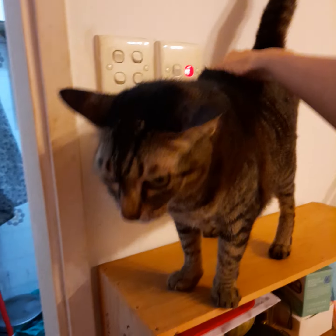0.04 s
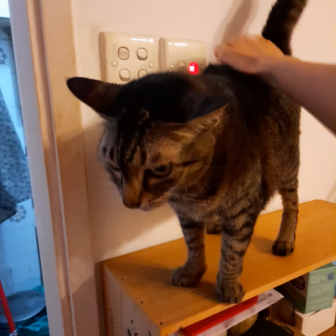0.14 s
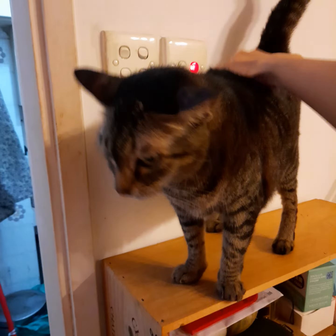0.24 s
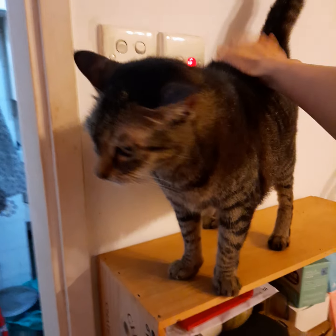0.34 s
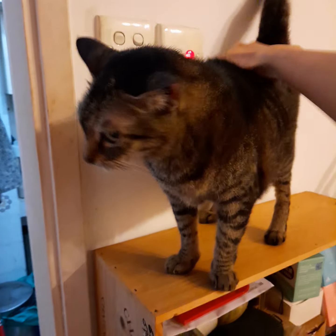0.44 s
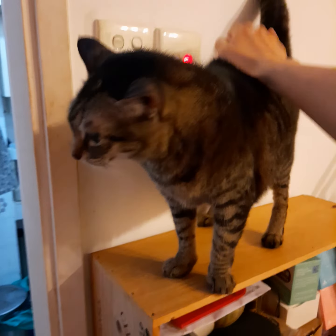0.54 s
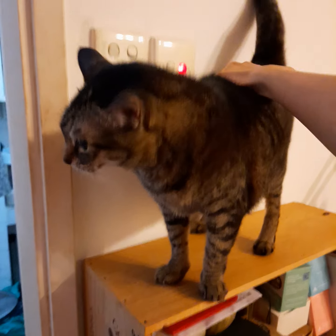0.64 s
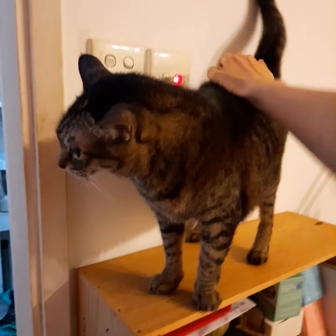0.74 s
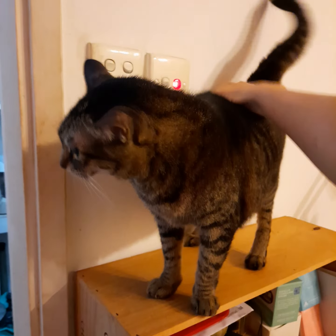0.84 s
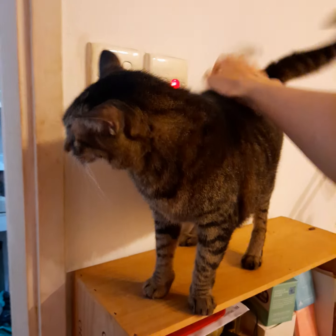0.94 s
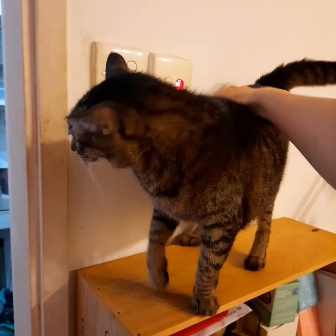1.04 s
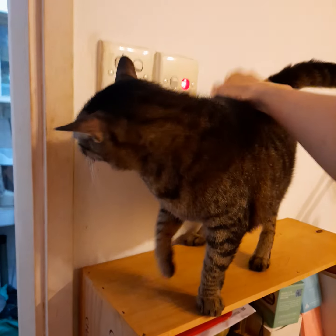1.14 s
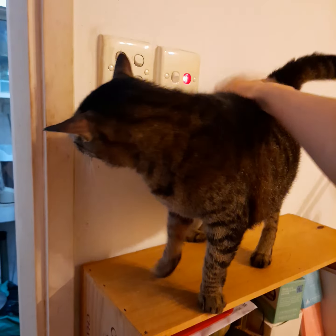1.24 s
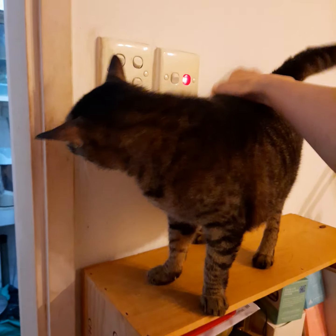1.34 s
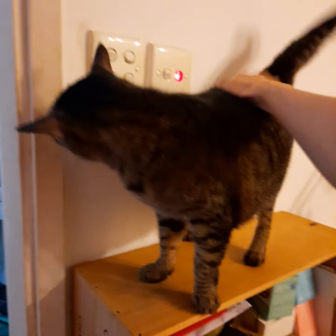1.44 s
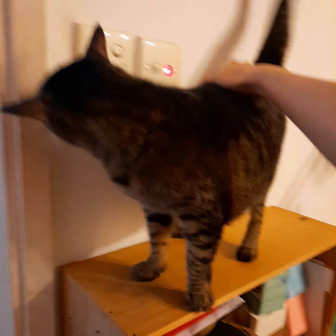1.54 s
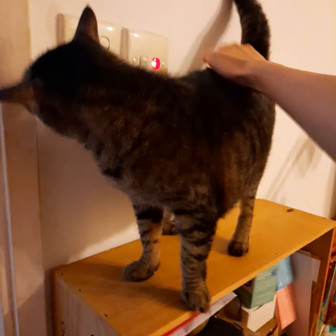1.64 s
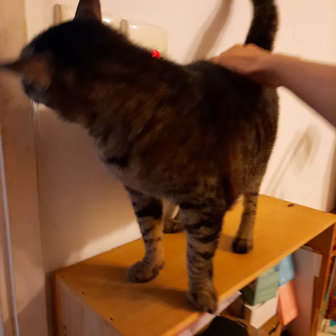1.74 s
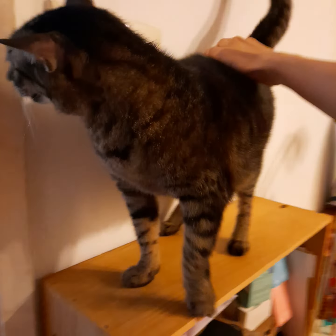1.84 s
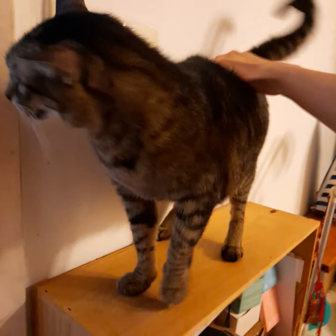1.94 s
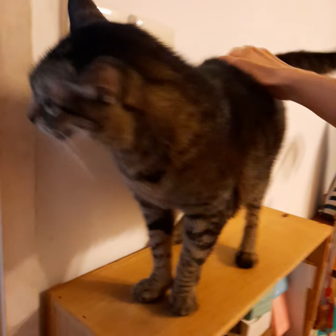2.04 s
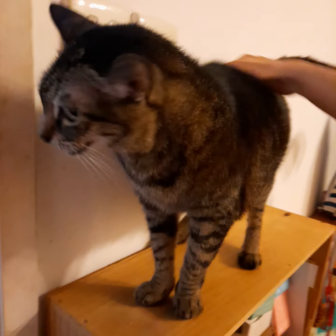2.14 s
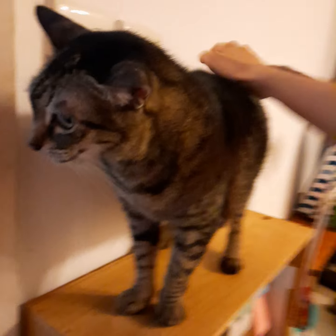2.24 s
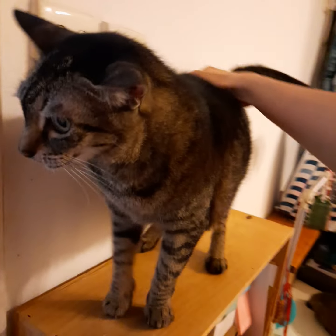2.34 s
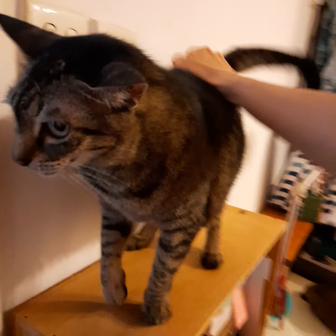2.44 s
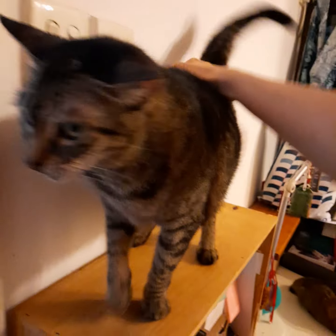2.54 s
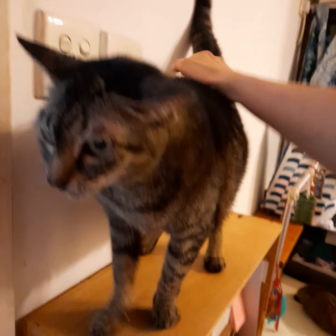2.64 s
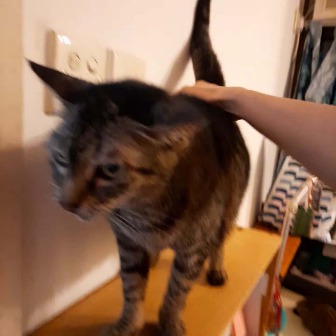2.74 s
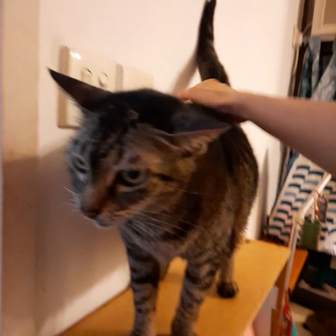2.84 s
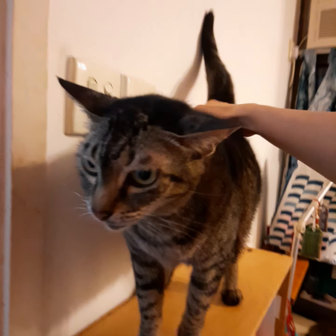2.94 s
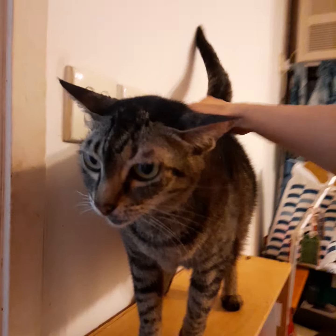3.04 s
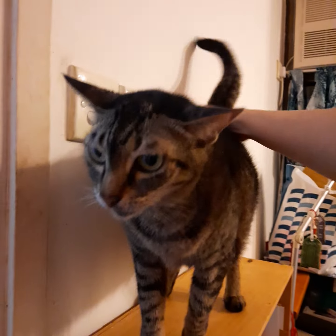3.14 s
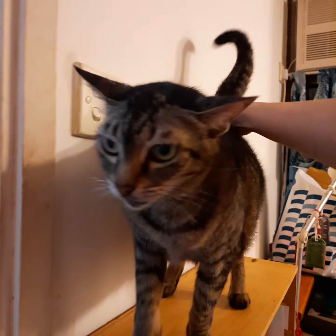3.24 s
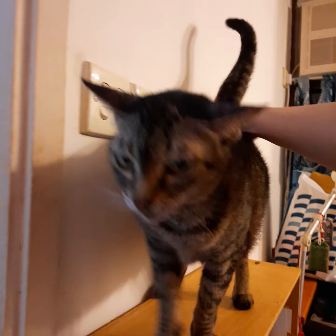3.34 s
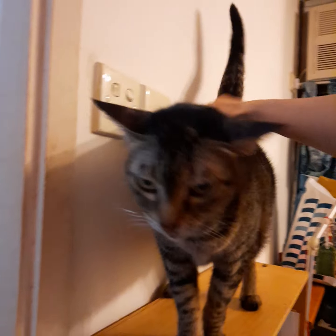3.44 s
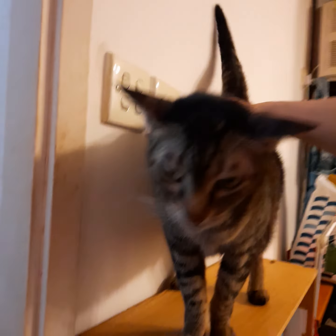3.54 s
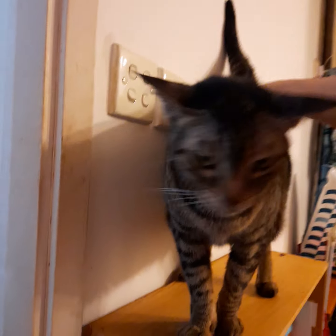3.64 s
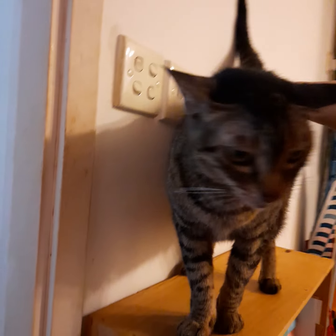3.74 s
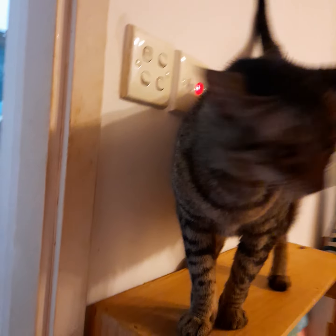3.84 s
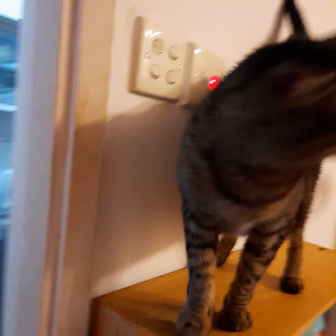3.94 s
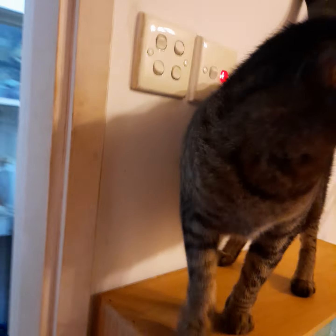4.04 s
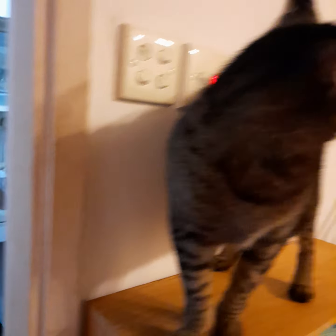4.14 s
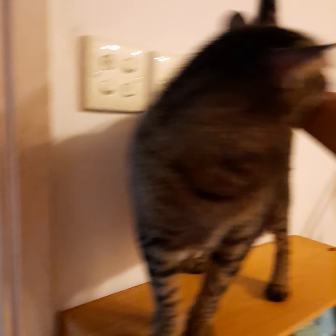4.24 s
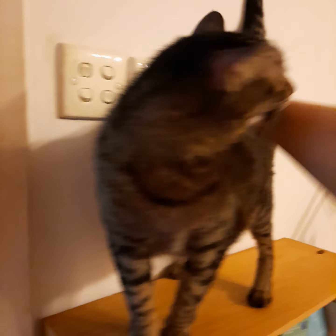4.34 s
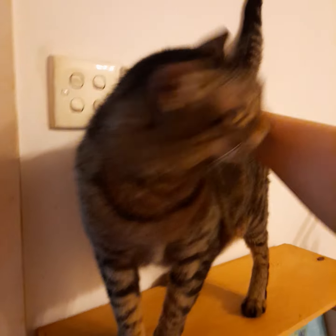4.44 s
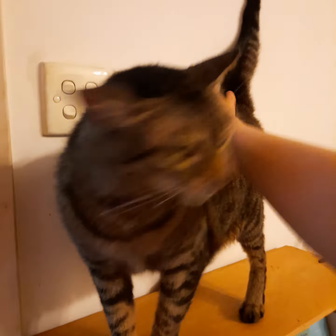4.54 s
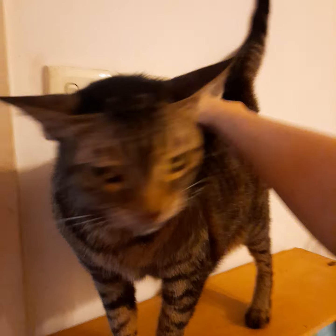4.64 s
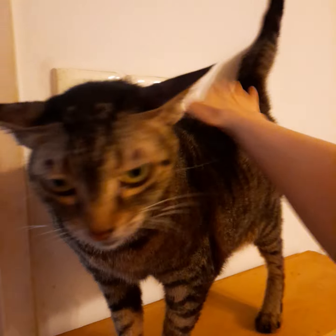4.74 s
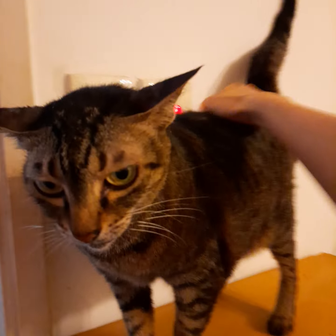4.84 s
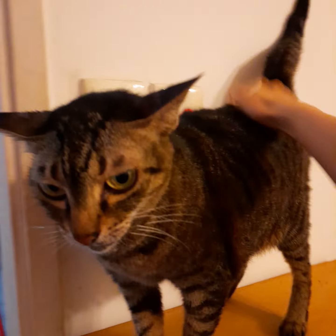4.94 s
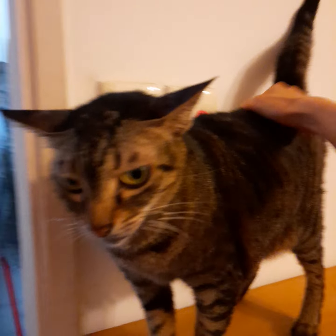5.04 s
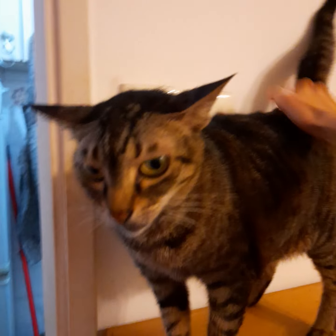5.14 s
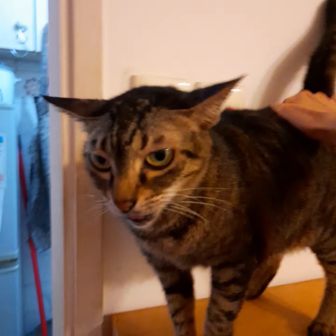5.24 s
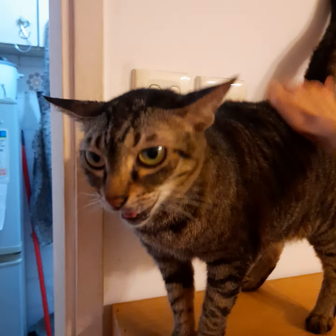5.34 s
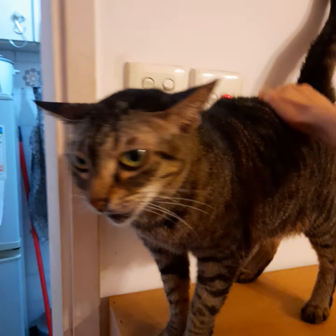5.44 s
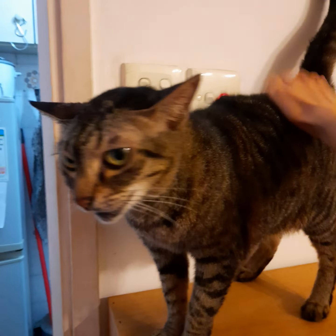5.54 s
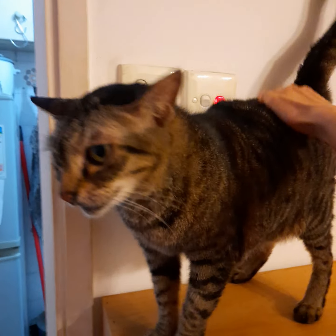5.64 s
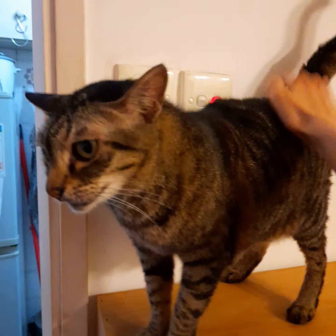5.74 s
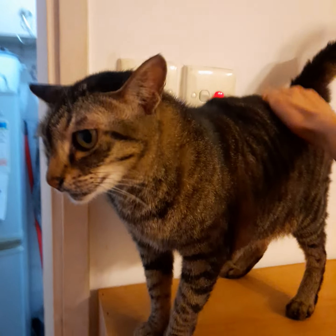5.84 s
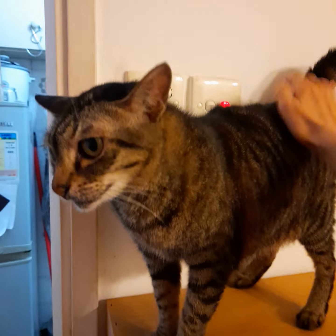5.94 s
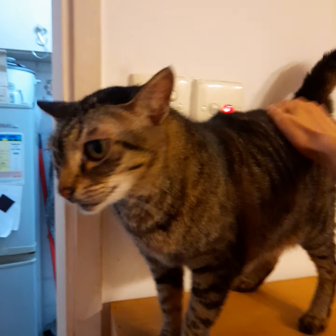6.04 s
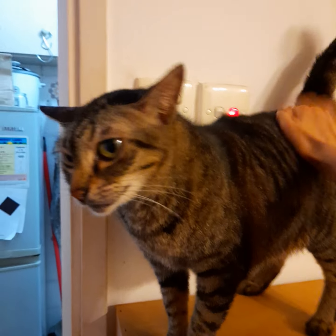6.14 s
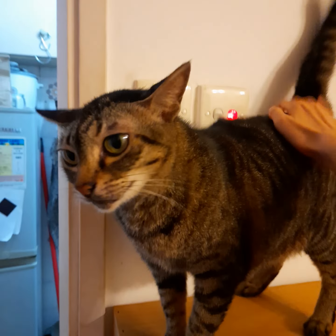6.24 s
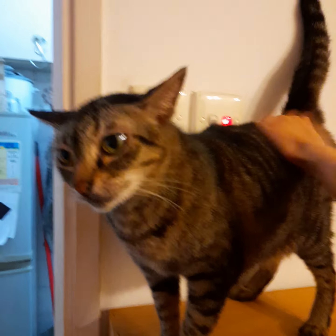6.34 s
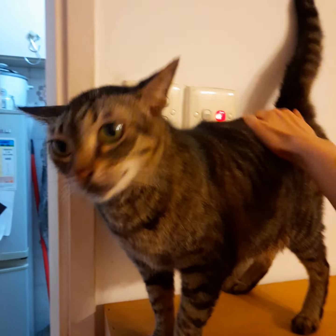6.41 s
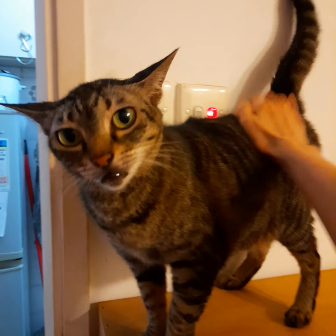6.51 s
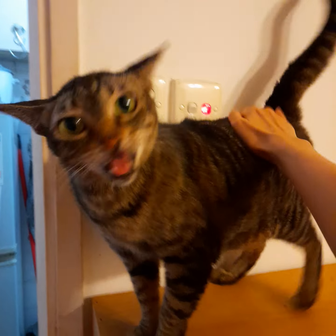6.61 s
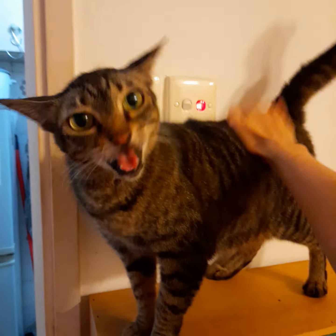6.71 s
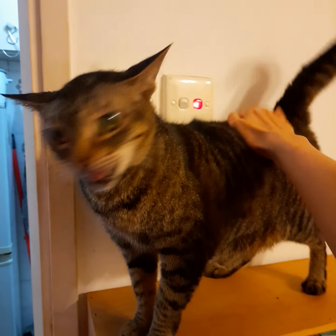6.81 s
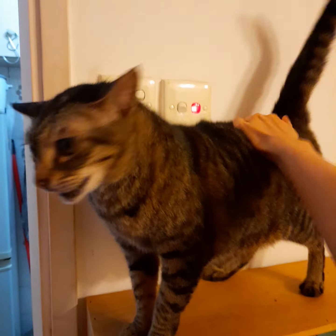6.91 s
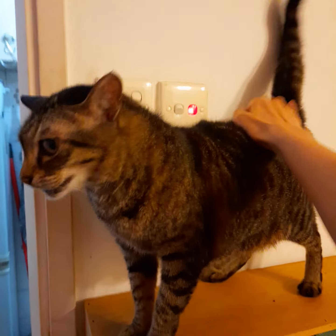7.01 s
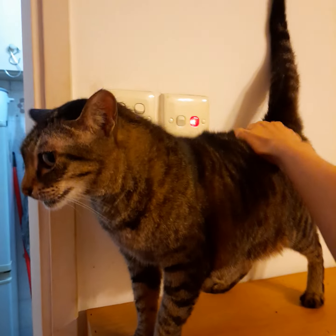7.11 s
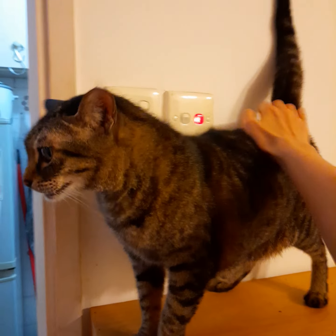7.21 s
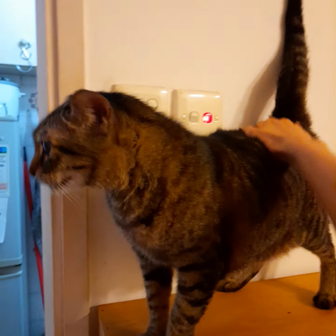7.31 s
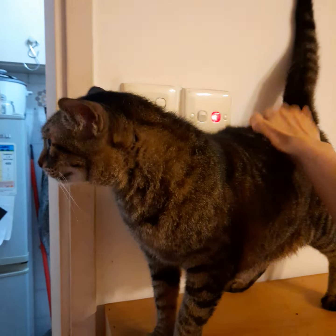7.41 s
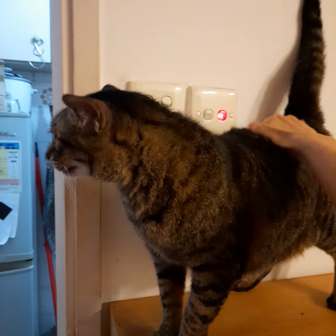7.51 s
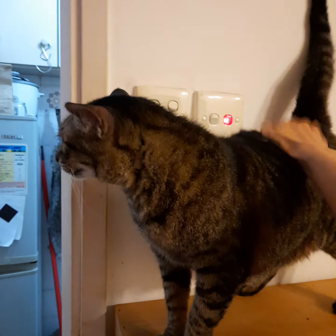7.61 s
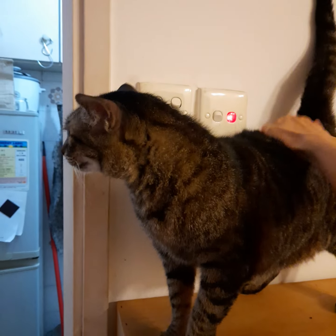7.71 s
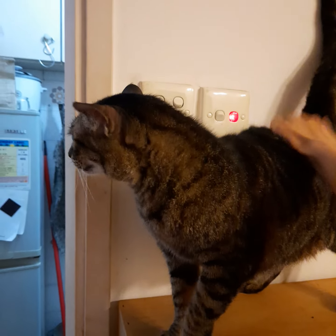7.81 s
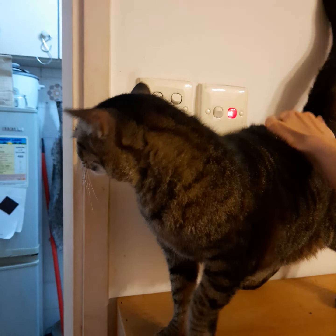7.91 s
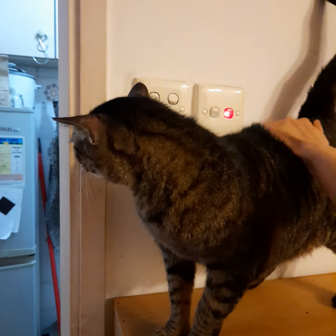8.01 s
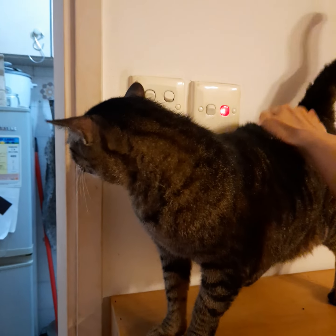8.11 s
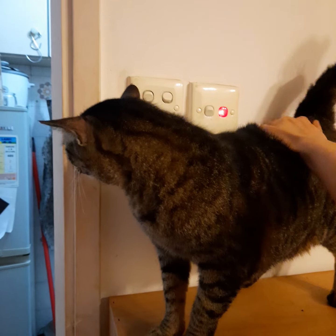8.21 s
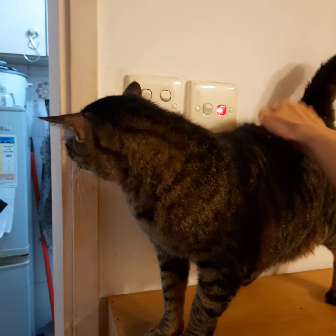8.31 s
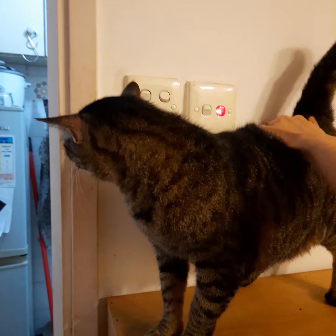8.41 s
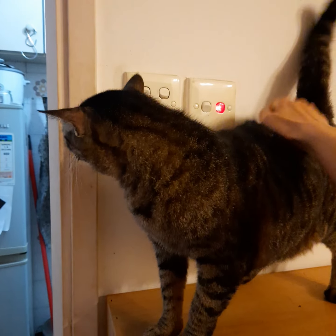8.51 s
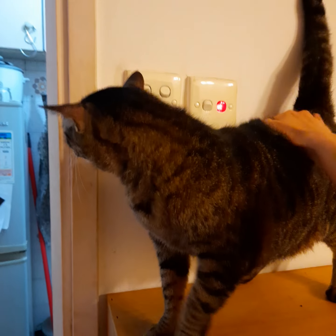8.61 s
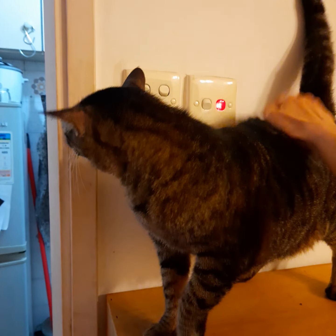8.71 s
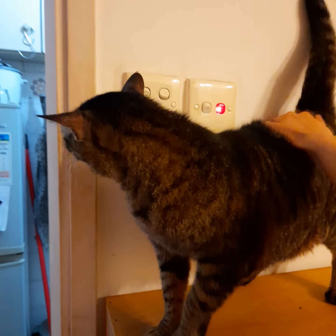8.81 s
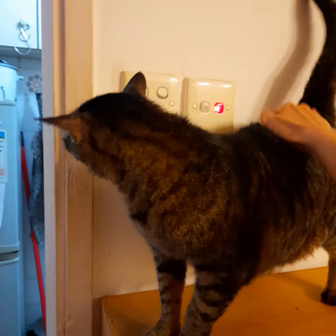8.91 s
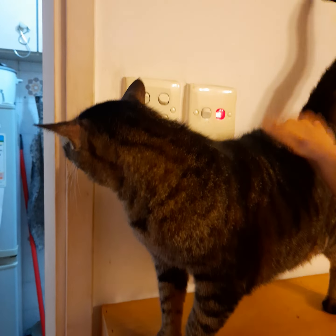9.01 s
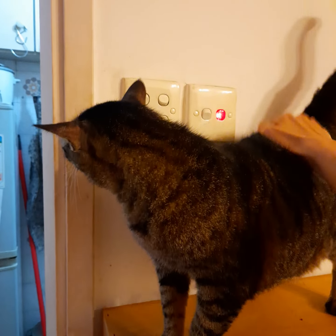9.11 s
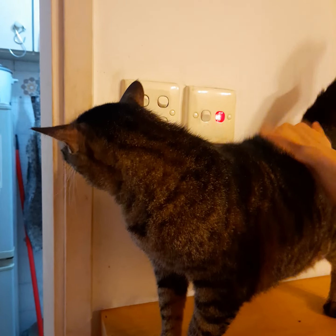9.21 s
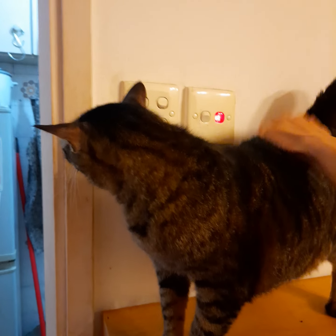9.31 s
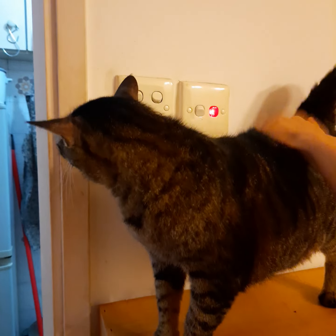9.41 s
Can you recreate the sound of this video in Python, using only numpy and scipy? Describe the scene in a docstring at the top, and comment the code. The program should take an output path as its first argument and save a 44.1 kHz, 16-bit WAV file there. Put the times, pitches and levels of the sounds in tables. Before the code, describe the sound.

Indoors, a tabby gives a weak creaky meow, then two louder hoarse-ending ones, with quiet rustling, ticks and a low steady appliance hum.

```python
"""A cat on a wooden shelf meows three times close to a wall: vocal-fold partials shaped by moving resonances.
A hand strokes its back: swelling noise bands for fur, cloth and the cat's breath, low noise for the hand.
An air conditioner hums, whines and hisses: wavering tones and banded stereo noise.
Small ticks (noise bursts, shelf modes), rustle puffs and thin gliding squeaks are scattered around the calls."""
import sys
import numpy as np
from scipy import signal
from scipy.io import wavfile
from scipy.ndimage import uniform_filter1d

SR = 44100
rng = np.random.default_rng(int(sys.argv[2]) if len(sys.argv) > 2 else 0)


def persist_wave(psi):
    """Save psi, clipped to +-1, as 16-bit WAV."""
    counts = np.round(np.clip(psi, -1, 1) * 32767).astype(np.int16)
    wavfile.write(sys.argv[1], SR, np.atleast_2d(counts).T)


N = 417186

# Motor lines. Each row: frequency in Hz, level in dB rms.
HUM_LINES = [(48.4, -81.5), (96.9, -67.5), (242.2, -59.5), (312.2, -48.5), (538.3, -64), (586.8, -60),
             (635.2, -67.5)]
HUM_WAVER_HZ, HUM_STEADY_SHARE = 9.2, 0.79
# Spectrum of the airflow. Each row: frequency in Hz, relative density in dB.
AIR_SPECTRUM = [(18, -53), (30, -26), (92, -32), (123, -15), (243, -6), (277, -6), (316, -7), (369, -4),
                (505, -11.5), (591, -15.5), (674, -17), (1680, -28), (3990, -45), (7280, -64),
                (15500, -58.5)]
AIR_RMS_DB = -49
# Airflow correlation. Each row: frequency in Hz, left-right likeness from -1 to 1.
AIR_LIKENESS = [(60, 0.36), (180, 0.95), (550, 0.59), (1650, -0.18), (4970, -0.5), (15000, -0.086)]
# Faint high motor tones. Each row: frequency in Hz, waver rate in Hz, level in dB rms.
WHINES = [(4580, 430, -81), (8100, 4, -90.5)]

# Swishes of fur, cloth and the cat's breath. Each row: middle in seconds, time from middle to -10 dB in seconds,
# swish level in dB, rustle level in dB.
SWISHES = [(.6, 0.12, -99, -95), (0.916, 0.15, -82, -84), (1.708, 0.062, -75, -73),
           (2.243, 0.052, -62, -73), (2.36, 0.08, -78, -74), (3.004, .15, -79.5, -98),
           (3.82, 0.13, -74, -95), (4.48, .12, -75, -96), (5.065, 0.068, -71, -86),
           (5.662, 0.037, -56, -77), (6.441, 0.088, -69, -79), (7.063, .07, -65, -82),
           (7.74, 0.13, -92, -90), (8.61, 0.15, -85, -97)]
SWISH_REST_DB, RUSTLE_REST_DB = -75.5, -79   # between swells
# Rumble of the holding hand. Each row: time in seconds, mean level in dB.
RUMBLE_COURSE = [(0.0, -58.5), (1.47, -55), (2.0, -56.5), (2.29, -62), (3.66, -65.5), (5.51, -52),
                 (5.72, -62), (7.25, -58), (7.61, -76.5), (8.56, -53), (9.2, -76), (9.46, -52)]
RUMBLE_LUMPS_DB, RUMBLE_LUMPS_HZ = 5, 2.7

# Ticks and scuffs of claws and small things. Each row: start in seconds, peak in dB before panning,
# body in Hz, treble gain in dB, rise in seconds, T60 in seconds, left over right in dB.
TICKS = [(0.613, -52, 1360, 2, 0.0014, 0.1, 18.5), (1.017, -45, 1860, -11, 0.025, 0.075, 6),
         (1.316, -39.5, 1360, -53, 0.0023, 0.038, 6), (2.306, -49, 2310, -22, 0.0093, 0.14, 4),
         (2.376, -47.5, 2210, -23, 0.0032, 0.15, 1), (2.41, -50.5, 1350, -24, 0.0019, 0.093, 7),
         (2.667, -43, 1390, -29, 0.00099, 0.041, 6), (3.253, -44.5, 2570, -15, 0.016, 0.08, 6),
         (3.402, -33.5, 1530, -6, 0.004, 0.048, 5.5), (3.962, -49, 2160, -3.5, 0.0048, 0.21, 8),
         (4.098, -41, 1860, 1, 0.0043, 0.036, 7.5), (4.172, -46.5, 2360, -11, 0.0049, 0.025, 3),
         (4.78, -56, 1380, 1, 0.0029, 0.091, 17), (5.782, -52.5, 1850, -3, 0.0015, 0.12, 9),
         (7.73, -47.5, 2930, -10, 0.007, 0.32, 9), (7.785, -47, 3040, -11, 0.02, 0.12, 5),
         (8.025, -43, 1490, -26, 0.0038, 0.069, 5), (8.609, -60, 2000, -0.5, 0.0065, 0.23, 31.5),
         (8.672, -53, 1830, -22, .005, 0.15, 5), (8.862, -50, 1380, -16, 0.0028, 0.18, 5)]
# Modes of the wooden shelf. Each row: frequency in Hz, relative level in dB, T60 in seconds.
SHELF_MODES = [(1500, 4.5, 0.022), (1783, 9.5, 0.031), (3200, -29, 0.065), (3360, -42, 0.08),
               (4740, -34, 0.076)]
ROOM_T60_S, CAT_ROOM_DB, TICK_ROOM_DB = 0.23, -12, -5.5

# Pitch, a list per meow. Each row: time in seconds, pitch in Hz.
PITCH = [
    [(1.62, 310.4), (1.69, 395), (1.75, 510), (1.815, 563.3), (1.92, 572.3), (1.99, 581), (2.11, 550.7),
     (2.22, 505.4)],
    [(5.0, 311.2), (5.13, 392.2), (5.22, 548), (5.28, 607.3), (5.35, 584.6), (5.41, 562.3), (5.45, 582.3),
     (5.5, 560), (5.69, 532)],
    [(6.42, 287.6), (6.51, 319.3), (6.55, 427.4), (6.62, 564.6), (6.65, 586.2), (6.76, 587.8), (6.86, 572),
     (6.94, 524.5), (6.97, 551.7), (7.02, 544), (7.1, 501)],
]
# Short pitch drops as the tiring folds falter. Each row: middle in seconds, share of pitch lost.
FALTERS = [(2.145, 0.1), (5.549, 0.054), (5.592, 0.12), (5.623, 0.11), (5.658, 0.19), (6.784, 0.028),
           (6.984, 0.0695), (7.009, 0.023), (7.039, 0.13), (7.068, 0.13)]
FALTER_HALF_WIDTH_S = 0.0088
# Mouth, a list per meow. Each row: time in seconds, effort in dB, main resonance in Hz,
# middle resonance in Hz, brightness (middle over main) in dB.
MOUTH = [
    [(1.62, -72, 1730, 3900, -20), (1.76, -58, 1830, 3970, -27), (1.808, -40.5, 2040, 3480, -26),
     (1.834, -36, 1830, 3470, -11), (1.928, -38.5, 2150, 3660, -16.5), (1.994, -32, 2140, 3530, -20),
     (2.092, -33, 2037, 4040, -35), (2.22, -58, 1980, 4080, -10)],
    [(5.0, -67.5, 2010, 3870, -16), (5.148, -52, 1950, 4340, -18), (5.212, -42, 1810, 3490, -14.5),
     (5.264, -18.5, 1920, 3590, -21), (5.29, -29.5, 1790, 3340, -3.5), (5.316, -28, 2500, 3620, -12),
     (5.344, -20, 2503, 3490, -28.5), (5.482, -21.5, 2596, 4230, -34), (5.558, -28.5, 2230, 3860, -36),
     (5.648, -37.5, 1930, 4220, -31), (5.69, -70, 2050, 3760, 0)],
    [(6.42, -70, 1770, 3960, -3), (6.546, -53.5, 1790, 3910, -16.5), (6.612, -25, 2250, 4080, -13.5),
     (6.66, -22, 2660, 4430, -13.5), (6.716, -21, 2200, 4000, -8.5), (6.776, -22.5, 2440, 4010, -19),
     (6.804, -19.5, 2490, 3520, -24), (6.893, -22, 2280, 3410, -34.5), (6.915, -32, 2180, 3350, -27.5),
     (7.034, -39.5, 2080, 3900, -25.5), (7.1, -69, 1955, 3930, -18)],
]
# Top resonance, lifted as the lips draw back, a list per meow. Each row: time in seconds, centre in Hz.
TOP = [
    [(1.83, 5430), (1.9, 5700), (1.99, 6750), (2.1, 5560)],
    [(5.2, 5850), (5.3, 6730), (5.5, 6840), (5.66, 5750)],
    [(6.6, 6560), (6.72, 6960), (6.88, 7140), (7.05, 6235)],
]
# Wall echoes, opposite in the two channels. Each row, one per meow: first delay in seconds, its level in dB,
# second delay in seconds, its level in dB.
WALL = [(0.0007, -7.5, 0.0039, -13), (0.00024, -11, 0.00137, -24.5), (.00012, -8.5, .0008, -5)]
WALL_FROM_HZ = 1190
# Settings of the meows. Each row, one per meow: creak end in seconds, time in seconds when the rasp is full,
# fundamental and second partial in dB at full effort, top resonance in dB over effort,
# base of the partials' breath in dB, hiss in dB over the top resonance,
# left over right in dB, lag of the right channel in seconds.
CALLS = [(1.812, 2.117, -45.5, -45, -8.5, -18.5, -10, 2, 0.00017),
         (5.206, 5.621, -42.5, -39.5, -7.5, -29.5, -19, 2, 0.000042),
         (6.556, 7.02, -45, -41, -11, -34, -26.5, 3, 0.000032)]
FULL_EFFORT_DB = -25
# Hoarseness 0-1: a creak that clears, a clean middle, a rasp at the end.
CREAK, CREAK_LATE, CLEAN, RASP = 0.7, 0.4, 0.018, 0.27
CLEAR_S, CRACK_S = 0.05, 0.022
HOARSE_DB_PER_PARTIAL = -3   # above the 4th, at hoarseness 1: hoarse folds close softly
CHEST_DB_PER_EFFORT_DB, CHEST_RISE_S, CHEST_FALL_S = -0.24, 0.23, 0.071   # the fundamental
SECOND_DB_PER_EFFORT_DB = 0.35
MAIN_WIDTH_HZ, MIDDLE_WIDTH_HZ, TOP_WIDTH_HZ, STEEPNESS = 202, 300, 810, 0.98
TOP_DB_PER_BRIGHT_DB, TOP_CREAK_DB, TOP_WAKES_S = 0.52, -6.5, 0.07   # nearly shut in the creak, then opens
EDGE_HZ, EDGE_WIDTH_HZ, EDGE_DB = 8200, 360, -15.5   # a last resonance, level relative to the top one
DIP_HZ, DIP_WIDTH_HZ, DIP_DB = 5570, 500, -3.5
ROLL_OFF_HZ, ROLL_OFF_DB_PER_KHZ, ROLL_OFF_SPAN_KHZ = 8600, -2.5, 2
BREATH_DB_PER_PARTIAL = 1.1
HISS_LOW_HZ, HISS_HIGH_HZ = 8020, 15500   # breath through the teeth

# Puffs of rustle. Each row: start in seconds, peak in dB, centre in Hz, time to peak in seconds
# (of the swell, before noise).
PUFFS = [(1.742, -45.5, 7400, 0.015), (2.29, -47, 8000, 0.02), (5.658, -51, 8200, 0.048),
         (7.607, -47.5, 11800, 0.018)]
# Thin gliding squeaks. Each row: start and end in seconds, first and last frequency in Hz, level in dB rms.
SQUEAKS = [(4.575, 4.613, 12150, 12000, -80), (4.64, 4.668, 11800, 12400, -78),
           (4.67, 4.695, 13000, 12800, -73), (4.688, 4.718, 12700, 11100, -68),
           (4.71, 4.76, 13100, 12700, -76), (4.764, 4.795, 12400, 11700, -75),
           (4.79, 4.84, 10900, 11100, -77)]
CUTOFF_HZ = 15800


def amp(db):
    """Decibels to amplitude."""
    return 10 ** (np.asarray(db) / 20)


def rms_one(x):
    """Scale to an rms of 1."""
    return x / np.sqrt(np.mean(x ** 2) + 1e-20)


def peak_one(x):
    """Scale to a peak of 1."""
    return x / np.max(np.abs(x))


def in_time(rows, t):
    """Interpolate every column after the first over time."""
    s, *columns = np.transpose(rows)
    return [np.interp(t, s, column) for column in columns]


def at_hz(points, hz):
    """Interpolate over log frequency."""
    point_hz, values = np.transpose(points)
    return np.interp(np.log(hz), np.log(point_hz), values)


def band(x, low_hz, high_hz):
    """Band-pass, second-order Butterworth prototype."""
    return signal.sosfilt(signal.butter(2, [low_hz, high_hz], "band", fs=SR, output="sos"), x)


def drift(rate_hz, size):
    """White noise through a double one-pole low-pass, run in; rms 1."""
    r = np.exp(-2 * np.pi * rate_hz / SR)
    white = rng.standard_normal(size + 8000)
    return rms_one(signal.lfilter([1], [1, -2 * r, r * r], white)[8000:])


def pan(x, db):
    """Mono to stereo, or balance of a stereo pair: left louder than right by db."""
    return x * amp([[db / 2], [-db / 2]])


def span(start_s, end_s):
    """Sample slice, times and a window with 3.7 ms ramps."""
    at = slice(round(start_s * SR), round(end_s * SR))
    t = np.arange(at.start, at.stop) / SR
    return at, t, np.clip(np.minimum(t - t[0], t[-1] - t) / 0.0037, 0, 1)


def hum():
    """Motor lines: a steady sine plus a part that wavers in a narrow band."""
    out, t = np.zeros(N), np.arange(N) / SR
    waver_share = np.sqrt(1 - HUM_STEADY_SHARE ** 2)
    for hz, db in HUM_LINES:
        turn = 2 * np.pi * (hz * t + rng.random())
        steady = np.sqrt(2) * np.sin(turn)
        waver = drift(HUM_WAVER_HZ, N) * np.cos(turn) + drift(HUM_WAVER_HZ, N) * np.sin(turn)
        out += amp(db) * (HUM_STEADY_SHARE * steady + waver_share * waver)
    return out


def airflow():
    """Third-octave bands of stereo noise, each with its own level and left-right likeness."""
    out, edges_hz = 0, 30 * 2 ** np.arange(0, 9.4, 1 / 3)
    white = rng.standard_normal((2, 2, N))   # neighbouring bands get unrelated noise
    for k, (low_hz, high_hz) in enumerate(zip(edges_hz, edges_hz[1:])):
        mid, side = band(white[k % 2], low_hz, high_hz)
        hz = np.sqrt(low_hz * high_hz)
        alike = at_hz(AIR_LIKENESS, hz)
        stereo = np.sqrt(1 + alike) * mid + np.sqrt(1 - alike) * side * [[1], [-1]]
        out = out + amp(at_hz(AIR_SPECTRUM, hz)) * stereo
    return amp(AIR_RMS_DB) * rms_one(out)


def whines():
    """High motor tones under low-passed noise, wavering independently in the two channels."""
    turn = 2 * np.pi * np.arange(N) / SR
    return np.array([sum(amp(db) * np.sqrt(2) * drift(waver_hz, N) * np.sin(hz * turn)
                         for hz, waver_hz, db in WHINES)
                     for channel in range(2)])


def swishes():
    """Strokes and the cat's breaths swell in two bright bands of hiss; the holding hand rumbles, leaning left."""
    t, white = np.arange(N) / SR, rng.standard_normal((5, N))
    swish, rustle = np.full(N, amp(SWISH_REST_DB)), np.full(N, amp(RUSTLE_REST_DB))
    for s, half_s, swish_db, rustle_db in SWISHES:
        swell = np.maximum(1 - ((t - s) / (1.5 * half_s)) ** 2, 0) ** 2
        swish += amp(swish_db) * swell
        rustle += amp(rustle_db) * swell
    flutter = amp(0.66 * drift(18, N))
    swish = swish * flutter * rms_one(band(white[:2], 6000, 8340))
    rustle = rustle * rms_one(band(white[2:4], 10000, 19845))
    rumble_db = in_time(RUMBLE_COURSE, t)[0] + RUMBLE_LUMPS_DB * drift(RUMBLE_LUMPS_HZ, N)
    rumble = amp(rumble_db) * rms_one(band(white[4], 29, 101))
    return swish + rustle + pan(rumble, 3.0)


def ticks():
    """Dying noise as body, broad knock and bright crack; the sharper the touch, the more the shelf rings."""
    out, t = np.zeros((2, N)), np.arange(round(.3 * SR)) / SR
    for s, db, hz, treble_db, rise_s, t60_s, side_db in TICKS:
        shape = np.minimum(t / rise_s, 1) * amp(-60 * np.maximum(t - rise_s, 0) / t60_s)
        burst = rng.standard_normal((3, len(t))) * shape
        body_gain = 3.55 * (1500 / hz) ** 2   # low bodies ring more clearly
        body = body_gain * band(burst[0], hz / 1.19, hz * 1.02)
        knock = 1.5 * band(band(burst[1], 1290, 3080), 950, 6800)
        crack = amp(treble_db) * band(burst[2], 4900, 7800)
        wood = 0
        for mode_hz, mode_db, mode_t60_s in SHELF_MODES:
            strength_db = rng.normal(0, 1.5)
            wood = wood + amp(mode_db + strength_db - 60 * t / mode_t60_s) * np.sin(2 * np.pi * mode_hz * t)
        tick = body + knock + 0.38 * np.exp(-rise_s / 0.005) * wood + crack
        at = round(s * SR)
        out[:, at:at + len(t)] += pan(amp(db) * peak_one(tick), side_db)
    return out


def room(x):
    """Reverb: a dying noise tail per side, unit energy on average, duller than the direct sound."""
    t = np.arange(round(.6 * SR)) / SR
    tail = band(rng.standard_normal((2, len(t))), 260, 4800) * amp(-60 * t / ROOM_T60_S) * (t > .004)
    return signal.fftconvolve(x, tail / np.sqrt(np.sum(tail ** 2) / 2), axes=1)[:, :N]


def wall(voice, echoes):
    """Two short echoes; long waves reach both channels alike and leave no difference."""
    side = sum(amp(db) * np.roll(voice, round(s * SR)) for s, db in zip(echoes[::2], echoes[1::2]))
    return band(side, WALL_FROM_HZ, 14000)


def meows():
    """Vocal-fold partials weighted by moving resonances of throat and mouth, with breath and wall echoes."""
    out = np.zeros((2, N))
    for course, mouth, top, echoes, call in zip(PITCH, MOUTH, TOP, WALL, CALLS):
        clears_s, rasps_s, chest_db, second_db, top_over_db, breath_db, hiss_db, lean_db, late_s = call
        at, t, window = span(course[0][0], course[-1][0])
        pitch_hz = uniform_filter1d(in_time(course, t)[0], size=900)
        for s, share in FALTERS:
            pitch_hz = pitch_hz * (1 - share * np.exp(-((t - s) / FALTER_HALF_WIDTH_S) ** 2))

        effort_db, main_hz, middle_hz, bright_db = in_time(mouth, t)
        top_hz = in_time(top, t)[0]
        slack_db = effort_db - FULL_EFFORT_DB
        shut = np.clip(1 - (t - clears_s) / TOP_WAKES_S, 0, 1)
        top_db = effort_db + top_over_db + TOP_DB_PER_BRIGHT_DB * bright_db + TOP_CREAK_DB * shut
        tract = [(main_hz, effort_db, MAIN_WIDTH_HZ),
                 (middle_hz, effort_db + bright_db, MIDDLE_WIDTH_HZ),
                 (top_hz, top_db, TOP_WIDTH_HZ)]

        rough = np.interp(t, [t[0], clears_s - CLEAR_S, clears_s, rasps_s - CRACK_S, rasps_s],
                          [CREAK, CREAK_LATE, CLEAN, CLEAN, RASP])
        # uneven cycles smear the partials; hoarse folds also beat in strength
        uneven = 1 + .003 * drift(25, len(t)) + .12 * rough * drift(150, len(t))
        turn = 2 * np.pi * np.cumsum(pitch_hz * uneven) / SR
        beat = 1 + rough * drift(90, len(t))

        # the fundamental thins as effort grows
        fade = np.clip(np.minimum((t - t[0]) / CHEST_RISE_S, (t[-1] - t) / CHEST_FALL_S), 0, 1)
        chest = fade * amp(chest_db + CHEST_DB_PER_EFFORT_DB * slack_db) * np.sin(turn)
        second = amp(second_db + SECOND_DB_PER_EFFORT_DB * slack_db) * np.sin(2 * turn)
        voice = chest + second
        for k in range(3, 26):
            hz = k * pitch_hz
            gain = amp(top_db + EDGE_DB) / (1 + ((hz - EDGE_HZ) / EDGE_WIDTH_HZ) ** 2)
            for centre_hz, db, width_hz in tract:
                gain = gain + amp(db) / (1 + ((hz - centre_hz) / width_hz) ** 2) ** STEEPNESS
            hoarse_db = HOARSE_DB_PER_PARTIAL * rough * max(k - 4, 0)
            dip_db = DIP_DB * np.exp(-((hz - DIP_HZ) / DIP_WIDTH_HZ) ** 2)
            roll_off_db = ROLL_OFF_DB_PER_KHZ * np.clip((hz - ROLL_OFF_HZ) / 1000, 0, ROLL_OFF_SPAN_KHZ)
            unsteady_db = min(0.31 * k, 5.0) * drift(31.6, len(t))   # high partials waver most
            gain = gain * amp(hoarse_db + dip_db + roll_off_db + unsteady_db)
            # turbulence between the partials
            breath = amp(breath_db + BREATH_DB_PER_PARTIAL * k) * drift(380, len(t))
            voice += gain * (1 + breath) * np.sin(k * turn + k * k)
        voice = np.sqrt(2) * voice * beat * window

        hiss_noise = rms_one(band(rng.standard_normal((2, len(t))), HISS_LOW_HZ, HISS_HIGH_HZ))
        hiss = window * amp(top_db + hiss_db) * hiss_noise
        direct = pan(np.array([voice, np.interp(t - late_s, t, voice)]), lean_db)
        out[:, at] += direct + wall(voice, echoes) * [[1], [-1]] + hiss
    return out


def puffs():
    """Soft swells of bright noise."""
    out, t = np.zeros((2, N)), np.arange(round(.25 * SR)) / SR
    for s, db, hz, length_s in PUFFS:
        swell = t / length_s * np.exp(1 - t / length_s)
        noise = band(rng.standard_normal((2, len(t))), hz / 1.96, hz * 1.44)
        at = round(s * SR)
        out[:, at:at + len(t)] += amp(db) * peak_one(swell * noise)
    return out


def squeaks():
    """Short sines, each gliding linearly in frequency."""
    out = np.zeros(N)
    for start_s, end_s, from_hz, to_hz, db in SQUEAKS:
        at, t, window = span(start_s, end_s)
        turn = 2 * np.pi * np.cumsum(np.linspace(from_hz, to_hz, len(t))) / SR
        out[at] += np.sqrt(2) * amp(db) * window * np.sin(turn)
    return out


def scene():
    """Mix all layers; only cat and ticks feed the room."""
    cat, small = meows(), ticks()
    wet = room(amp(CAT_ROOM_DB) * cat + amp(TICK_ROOM_DB) * small)
    return hum() + airflow() + whines() + swishes() + small + cat + wet + puffs() + squeaks()


def record(dry):
    """The microphones drop the deepest bass; the top is cut steeply."""
    dry = signal.sosfilt(signal.butter(6, 38, "high", fs=SR, output="sos"), dry)
    return signal.sosfilt(signal.cheby2(24, 60, CUTOFF_HZ, fs=SR, output="sos"), dry)


dry = scene()
out = record(dry)
persist_wave(out)
```